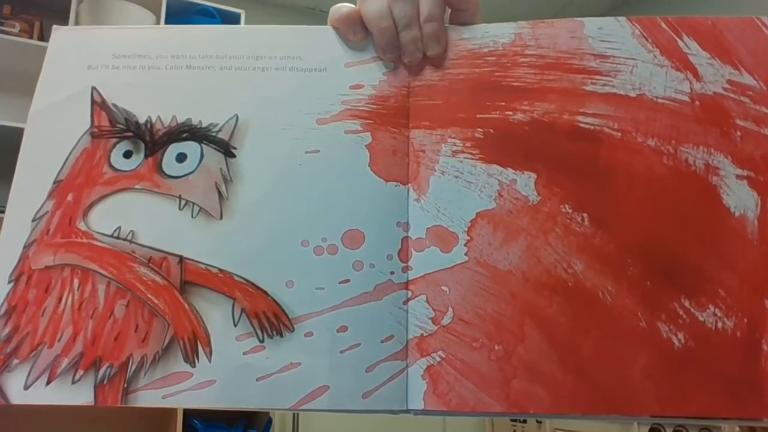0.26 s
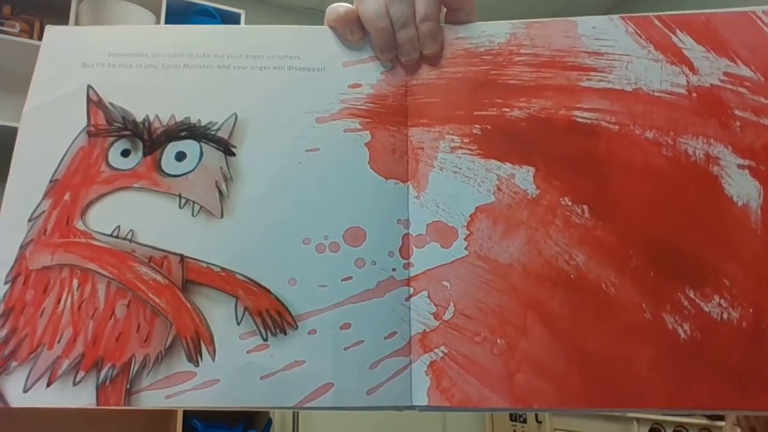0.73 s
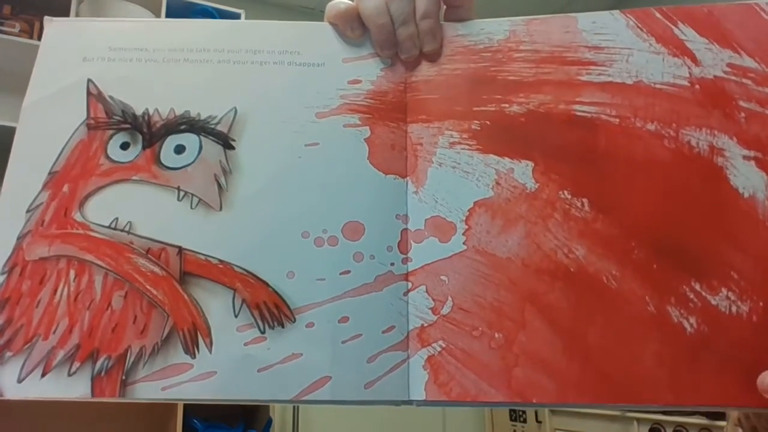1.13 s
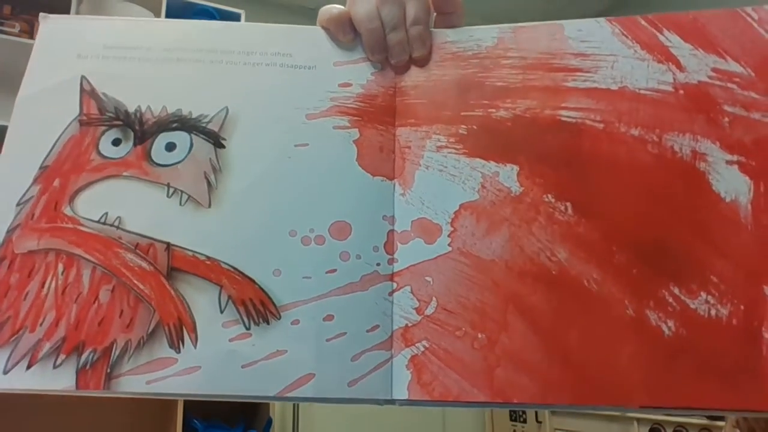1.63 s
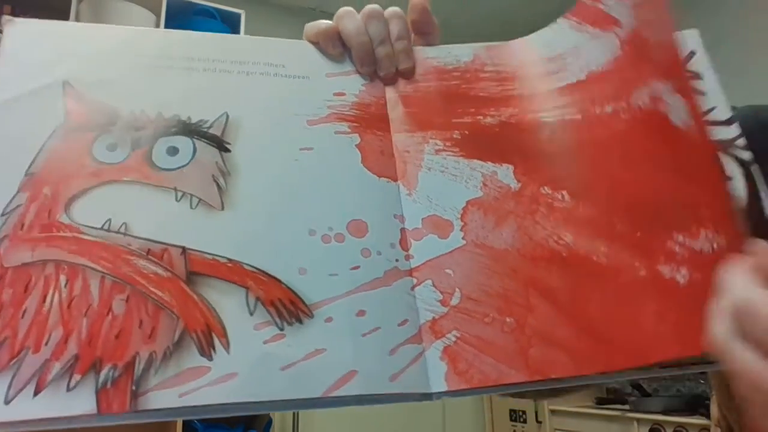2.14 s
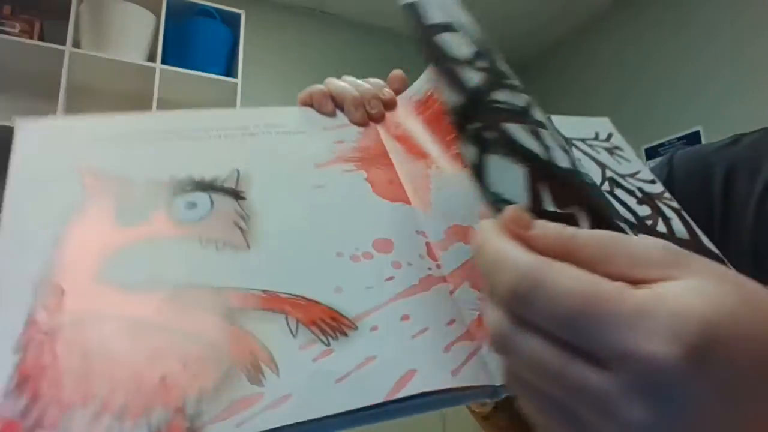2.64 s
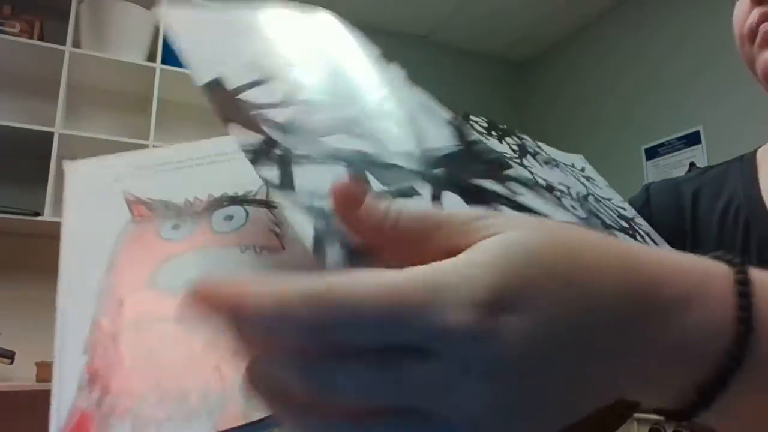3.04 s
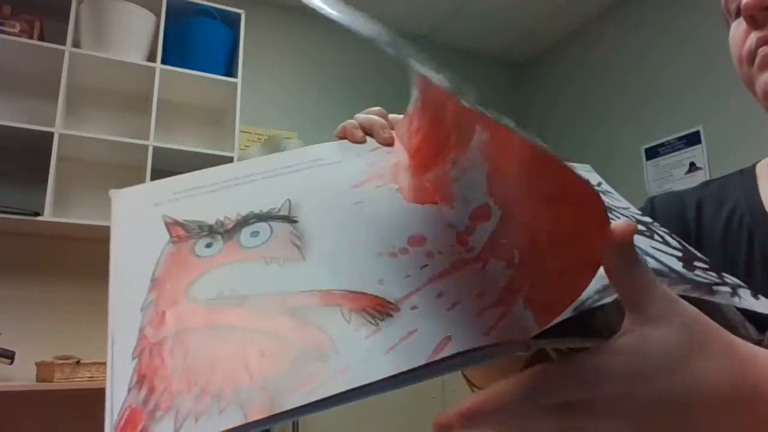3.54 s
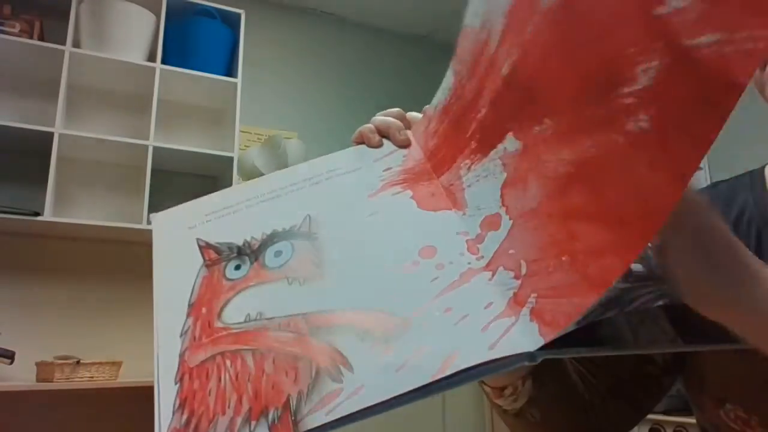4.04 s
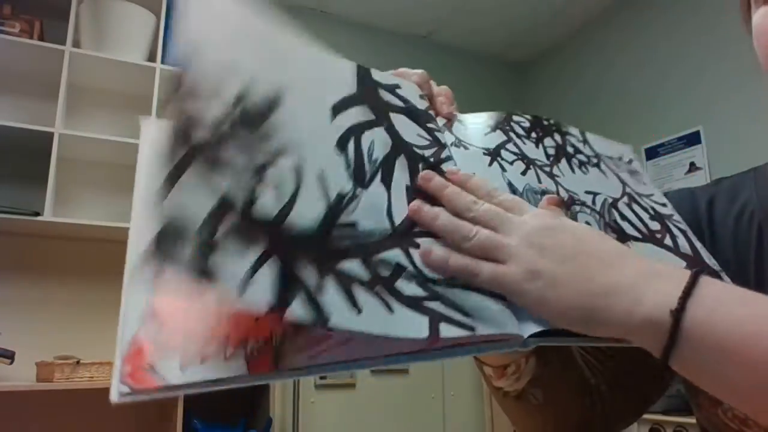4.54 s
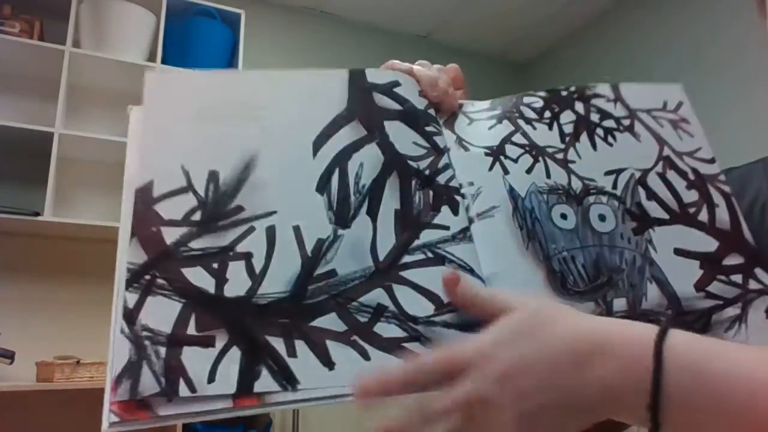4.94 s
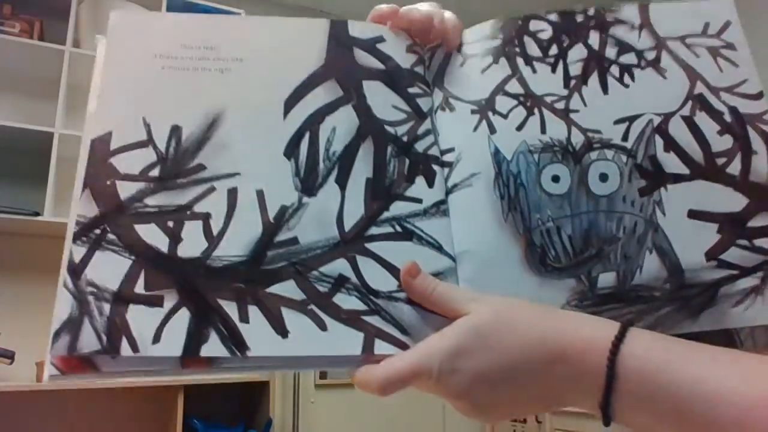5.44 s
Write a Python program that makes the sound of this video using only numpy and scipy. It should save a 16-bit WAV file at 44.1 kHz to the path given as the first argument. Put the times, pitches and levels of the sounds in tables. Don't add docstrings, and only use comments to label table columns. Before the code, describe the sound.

Close paper handling: near silence, then crisp snaps, fingertip rubs and a flexing page turned and smoothed flat over low room rumble.

```python
import sys
import numpy as np
from scipy import signal
from scipy.fft import rfft, irfft, dct, next_fast_len
from scipy.io import wavfile
from scipy.ndimage import uniform_filter1d, map_coordinates

SR = 44100
rng = np.random.default_rng(int(sys.argv[2]) if len(sys.argv) > 2 else 0)


def output_pcm(signal):
    pcm = np.clip(np.atleast_2d(signal).T, -1, 1) * 32767
    wavfile.write(sys.argv[1], SR, np.round(pcm).astype(np.int16))


def gain_from_decibels(decibels):
    exponent = np.asarray(decibels, float) / 20
    return 10 ** exponent


N = 251105
TOP_HZ = 15950

# f/Hz, density/dB per Hz
AIR_COLOUR = [(20, -77), (30, -47), (56, -18), (75, -9), (125, -1.5), (200, -10.5), (270, -23),
              (400, -29.5), (1000, -43.5), (2000, -51), (3500, -44.5), (8000, -39), (12000, -36),
              (16000, -41.5)]
# f/Hz, level/dB rms
WHINES = [(2907, -92), (8000, -80), (8683, -90), (10191, -94), (10907, -80), (11590, -85), (13098, -90)]
# f/Hz, t60/s
ROOM_DECAY = [(300, 0.18), (2000, 0.15), (6000, 0.17), (14000, 0.15)]
# f/Hz, width/Hz, level/dB
SHEET_MODES = [
    [(186, 66, 0.5), (370, 105, 1.5), (492, 110, 4.5), (701, 76, -0.5)],
    [(1006, 118, 1.5), (1177, 150, -1), (1540, 49, -0.5)],
]
# loudest t/s, low level/dB, upper re low level/dB, rise/ms, fall/ms
FLEXES = [(.75, -82.5, 10.5, 150, 59), (.96, -82.5, 6.5, 64, 110), (1.83, -72, 7, 80, 150),
          (2.11, -59.5, -6, 470, 62), (2.22, -70.5, -4.5, 250, 430), (2.843, -49, -7, 11, 63),
          (2.918, -49, 3, 12, 26), (3.05, -66.5, 4.5, 70, 98), (4.176, -41, -4.5, 36, 55),
          (4.4, -85, -4, 270, 220), (5.184, -67, 11, 8, 60), (5.34, -61, 2, 98, 43),
          (5.52, -58, -8.5, 280, 95), (5.672, -53.5, 2.5, 133, 37)]
# t/s, low level/dB, upper re low level/dB, fall/ms to 20 dB down
THUMPS = [(1.594, -55.5, 4, 16), (1.913, -56, 1.5, 25), (1.932, -62, 4, 60), (2.292, -69, -1, 74),
          (2.671, -54, -9, 65), (3.304, -62.5, -3.5, 149), (3.71, -48, -7.5, 60), (3.768, -52.5, -19, 109),
          (4.125, -50, -14, 300), (4.553, -56, 3, 23), (4.571, -56.5, 2.5, 32), (4.681, -55, 6.5, 38),
          (4.8, -59, -2.5, 48), (4.89, -70, -9, 450), (5.374, -37, 3.5, 16), (5.385, -54, -7, 66),
          (5.457, -56, 7, 37), (5.551, -47.5, -6, 29)]
# f/Hz, density/dB per Hz
POCKET_COLOUR = [(880, -59), (1500, -26), (3610, -6.5), (3890, -6), (4310, 3), (6570, -13), (7920, -10),
                 (11600, -22), (14000, -45)]
# f/Hz, density/dB per Hz
RASP_COLOUR = [(350, -29.5), (600, -20.5), (1740, -1), (2060, -11), (2770, 1), (3440, -3.5), (4130, 4),
               (4600, 2), (5070, 2.5), (6370, -3.5), (8000, -13.5), (10400, -48), (17600, -120)]
# f/Hz, density/dB per Hz
HISS_COLOUR = [(4000, -47), (7000, -13), (8500, -9.5), (12000, -6.5), (15800, -12.5), (17000, -6.5)]
# t/s, pressure level/dB
GLIDE_PRESSURE = [(1.55, -81.5), (1.75, -66.5), (1.85, -59.5), (1.94, -60.5), (2.13, -64.5), (2.45, -74),
                  (3.03, -67.5), (3.42, -70.5), (3.85, -82), (4.12, -80), (4.172, -54.5), (4.4, -61),
                  (4.5, -63.5), (4.64, -55), (4.7, -52), (5.09, -62.5), (5.52, -65), (5.694, -56)]
# start t/s, length/ms, level/dB, hiss re rasp level/dB, sag/dB over the length
DRAGS = [
    (.7, 60, -75, 10, 1),
    (1.786, 26, -61, 9, -2),
    (1.829, 58, -42.5, -0.5, 6.5),
    (2.672, 45, -71, -1, -2),
    (5.103, 11.7, -46, -3, 0.5),
    (5.456, 13, -52, -8, 1),
    (5.524, 23, -49, 2.2, 0),
]
# loudest t/s, level/dB, hiss re rasp level/dB, rise/ms, fall/ms to 20 dB down
SCRAPES = [(.956, -77, 12, 12, 12), (1.0, -78.5, 14, 68, 60), (1.822, -33, 1.5, 10, 6.5),
           (1.913, -46.5, -12, 5.1, 0), (1.935, -56, 0, 11, 40), (2.008, -40, 3, 11, 6),
           (2.015, -56, -6, 34, 33), (2.919, -33, -14, 11, 11.5), (3.688, -57, -1, 28, 38),
           (3.812, -64, 0, 46, 24), (4.268, -53.5, 5, 29, 62), (4.648, -43.5, -8, 22, 22),
           (4.685, -21.5, -6, 12.3, 3), (4.9, -48, 9, 250, 156)]
# t/s, middle peak level/dB, body peak level/dB, edge peak level/dB
LIFT_FLIPS = [(.6949, -47, -56.5, -42.5), (.7196, -56, -68, -51), (.7455, -55, -54, -52),
              (1.3104, -53, -69, -38), (1.5881, -31, -45, -29), (1.7374, -57, -55, -45),
              (1.79, -41.5, -61, -50), (1.82, -37, -42, -32), (1.9099, -29, -31.5, -36),
              (1.9299, -33, -42, -45), (1.9372, -41, -54, -49), (1.9473, -52, -51, -54),
              (2.1806, -53, -68, -57), (2.207, -54, -62, -50), (2.2395, -41.5, -57, -39),
              (2.2905, -35, -65, -26.5), (2.2934, -27.5, -50, -28), (2.4139, -51, -52.5, -57)]
# t/s, middle peak level/dB, body peak level/dB, edge peak level/dB
CURL_FLIPS = [(2.5108, -45, -64, -33), (2.5176, -47.5, -66, -35), (2.527, -55, -62, -35.5),
              (2.5932, -55, -62, -38.5), (2.6464, -61, -77, -52), (2.6666, -22.5, -39, -31.5),
              (2.7897, -59, -72, -40.5), (2.8005, -34, -46.5, -47), (2.841, -49, -42, -49),
              (2.974, -39.5, -51, -60), (2.9839, -43, -54, -56), (3.067, -48, -54, -61),
              (3.1064, -49, -67, -34.5), (3.16, -47.5, -63, -62), (3.1947, -42, -61, -38),
              (3.2104, -55, -73, -44), (3.2649, -35, -63, -30.5), (3.2924, -32, -50.5, -35),
              (3.3793, -55, -74, -52), (3.4305, -52, -65, -40.5), (3.518, -55, -66, -58),
              (3.664, -58, -53.5, -51)]
# t/s, middle peak level/dB, body peak level/dB, edge peak level/dB
LAY_FLIPS = [(4.1233, -33, -43, -36), (4.1663, -45, -35, -36), (4.255, -47, -48, -43),
             (4.28, -42, -59, -40), (4.3038, -39, -57, -43), (4.3803, -30.5, -51, -27.5),
             (4.3958, -42, -65, -25), (4.4031, -54, -72, -33), (4.4164, -28.5, -52, -22),
             (4.4278, -37, -53, -29), (4.4473, -42, -74, -43), (4.5532, -44, -53, -50),
             (4.6341, -36, -51, -45), (4.6453, -48, -43, -35), (4.6577, -33, -49, -37),
             (4.6708, -29, -37, -23), (4.8031, -22.5, -35.5, -13.5), (4.9879, -36, -63, -29.5),
             (4.996, -53, -68, -31), (5.0476, -46.5, -63, -36), (5.2135, -60, -71, -49),
             (5.2566, -36.5, -46, -55), (5.3046, -32.5, -57, -43), (5.3268, -39, -56, -53),
             (5.3503, -40, -56, -51), (5.3718, -23, -26, -23), (5.4012, -44, -46, -49),
             (5.5489, -37, -32, -45), (5.598, -46, -62, -58), (5.6885, -44, -59, -34)]
# rise/ms, fall/ms
FLIP_SHAPES = [
    (0.35, 1.8),
    (1.47, 0.79),
    (0.36, 1.46),
]
# t/s, length/ms, kept lines above local rms level/dB, share removed
THINNINGS = [(.308, 26, 8, .85), (.926, 26, 8, .85), (1.055, 24, 8, .85), (1.546, 26, 8, .85),
             (1.76, 50, 8, .75), (1.974, 44, 6, .75), (2.122, 36, 8, .85), (2.162, 40, 7, .75),
             (2.503, 30, 8, .85), (2.587, 30, 6, .8), (2.937, 48, 4, .85), (3.187, 30, 6, .85),
             (3.955, 36, 8, .85), (4.191, 46, 7, .8), (5.089, 36, 7.5, .97), (5.652, 66, 7.5, .99)]


def unit(x):
    return x / np.sqrt(np.mean(x ** 2) + 1e-20)


def along(points, hz):
    f, v = np.transpose(points)
    return np.interp(np.log(hz + 1), np.log(f + 1), v)


def curves(rows):
    s, *cols = np.transpose(rows)
    s = np.r_[s[0] - .008, s, s[-1] + .008]
    t = np.arange(N) / SR
    return np.array([np.interp(t, s, np.r_[-130, c, -130]) for c in cols], dtype=np.float32)


def swells(rows, power):
    out = np.zeros((2, N))
    for s, db, other_db, rise, fall in rows:
        first = max(round((s - rise / 300) * SR), 0)
        last = min(round((s + fall / 300) * SR), N)
        at = np.arange(first, last)
        ms = (at / SR - s) * 1000
        drop_db = 20 * np.abs(ms / np.where(ms < 0, rise, fall)) ** power
        out[:, at] += gain_from_decibels(np.c_[[db, db + other_db]] - drop_db)
    return out


def wobble(rate):
    coarse = np.arange(0, N + 8, 8)
    knots = rng.standard_normal(int(N * rate / SR) + 4)
    return np.interp(np.arange(N), coarse, map_coordinates(knots, [coarse * rate / SR]))


def filtered(x, response):
    m = next_fast_len(N + SR // 2)
    return irfft(rfft(x, m) * response(np.fft.rfftfreq(m, 1 / SR)), m)[..., :N]


def band(x, lo_hz, hi_hz):
    sos = signal.butter(2, [lo_hz, min(hi_hz, SR / 2.1)], "band", fs=SR, output="sos")
    return signal.sosfilt(sos, x)


def coloured(x, spectrum):
    return unit(filtered(x, lambda hz: gain_from_decibels(along(spectrum, hz))))


def patchy(x, depth_db):
    z = signal.stft(x, nperseg=256)[2]
    field = uniform_filter1d(rng.standard_normal(z.shape), size=9, axis=0)
    field = uniform_filter1d(field, size=9, axis=1)
    return signal.istft(z * gain_from_decibels(depth_db * unit(field)), nperseg=256)[1][:N]


def air():
    t, drift = np.arange(N) / SR, wobble(3.8)
    level = gain_from_decibels(-59 - 1.1 + .8 * wobble(3))
    noise = level * coloured(rng.standard_normal(N), AIR_COLOUR)
    whines = sum(gain_from_decibels(db + 3) * np.sin(2 * np.pi * hz * t + 0.27 * drift) for hz, db in WHINES)
    return noise + whines


def room(x):
    out, step = np.zeros(N + SR), SR // 3
    for i in range(0, N, step):
        hz, t, z = signal.stft(rng.standard_normal(step), SR, nperseg=128)
        decay = gain_from_decibels(-60 * t / along(ROOM_DECAY, hz)[:, None])
        tail = signal.istft(z * decay, SR, nperseg=128)[1]
        wet = signal.fftconvolve(x[i:i + step], tail / np.linalg.norm(tail))
        out[i + 60:][:len(wet)] += wet
    return out[:N]


def whisk():
    brush = swells([(3.4, -67.5, 0, 330, 300)], power=2.3)[0]
    return brush * unit(band(patchy(rng.standard_normal(N), depth_db=1.0), 12000, 14800))


def ring(modes):
    def response(f):
        total = 0
        for k, (centre, width, db) in enumerate(modes):
            damping = 1j * f * width
            total = total + (-1) ** k * gain_from_decibels(db) * damping / (centre * centre - f * f + damping)
        return total
    return response


def bend():
    push = rng.standard_normal(N) * gain_from_decibels(2.6 * wobble(150))
    buckles = [(s, db, upper_db, 3, fall) for s, db, upper_db, fall in THUMPS]
    moves = swells(FLEXES + buckles, power=0.85)
    out = np.zeros(N)
    for gain, modes in zip(moves, SHEET_MODES):
        out += gain * unit(band(filtered(push, ring(modes)), 110, 2700))
    return out


def pinch():
    grip = swells([(2.886, -38.5, 0, 44, 29)], power=0.94)[0]
    grains = rng.standard_normal(N) * gain_from_decibels(2.2 * wobble(610))
    return grip * coloured(grains, POCKET_COLOUR)


def friction(rasp, hiss, grit_db, slips):
    rub = rng.standard_normal(N) * gain_from_decibels(grit_db * wobble(slips) + 2.5 * wobble(slips / 10))
    ticks = 4 * rng.standard_normal(N) * (rng.random(N) < 80 / SR)
    rub = patchy(rub + ticks, depth_db=1.6)
    return rasp * coloured(rub, RASP_COLOUR) + hiss * coloured(rub, HISS_COLOUR)


def slide():
    pressure = gain_from_decibels(curves(GLIDE_PRESSURE)[0])
    gloss = gain_from_decibels(4.5)
    return friction(pressure, gloss * pressure, grit_db=2.5, slips=550)


def drags():
    catch_ms, release_ms = 4.3, 4.6
    out = np.zeros((2, N))
    for s, ms, db, edge_db, sag_db in DRAGS:
        end_db = db - sag_db
        steps = [(s - catch_ms / 1000, db - 20), (s, db),
                 (s + ms / 1000, end_db), (s + (ms + release_ms) / 1000, end_db - 20)]
        out += gain_from_decibels(curves([(at, level, level + edge_db) for at, level in steps]))
    return out


def scrapes():
    rasp, hiss = swells(SCRAPES, power=1.42) + drags()
    return friction(rasp, hiss, grit_db=1.0, slips=1000)


def peak_band(burst, lo_hz, hi_hz):
    v = band(band(burst, lo_hz / 1.96, hi_hz * 1.96), lo_hz, hi_hz)
    return v / np.abs(v).max(axis=1, keepdims=True)


def snaps():
    rows = []
    for table, shape in zip((LIFT_FLIPS, CURL_FLIPS, LAY_FLIPS), FLIP_SHAPES):
        rows += [(*row, *shape) for row in table]
    s, db, body_db, edge_db, rise, fall = np.transpose(rows)[..., None]
    z = rng.standard_normal((len(rows), 2, 1024))
    ms = np.arange(1024) / SR * 1000 - rise
    attack = np.exp(-1.2 * (ms / np.clip(rise, .45, 5)) ** 2)
    decay = np.exp(-.8 * (ms / np.clip(fall, .4, 5)) ** 2)
    rattle = 0.092 * np.exp(-np.abs(ms) / 4)
    crackle = z[:, 0] * gain_from_decibels(2.6 * z[:, 1]) * np.where(ms < 0, attack, decay + rattle)
    click = 2.25 * (np.abs(ms) < 600 / SR) * z[:, 1, :1]
    burst = crackle + click
    sound = gain_from_decibels(db) * peak_band(burst, 1800, 7500)
    sound -= gain_from_decibels(body_db) * peak_band(burst, 400, 1500)
    sound -= gain_from_decibels(edge_db) * peak_band(burst, 8000, 17500)
    at = np.round(s * SR).astype(int) + np.arange(1024)
    return np.bincount(at.ravel(), sound.ravel(), N + SR)[:N] * gain_from_decibels(-1.0)


def scene():
    cracks = snaps()
    rubs = scrapes() + pinch() + slide() + gain_from_decibels(-2.0) * bend() + whisk()
    bed = rubs + room(gain_from_decibels(-10.5) * cracks + gain_from_decibels(-19.5) * rubs) + air()
    mono = filtered(cracks, lambda hz: np.where(hz < TOP_HZ, 1, gain_from_decibels(-30)))
    mono = mono + filtered(bed, lambda hz: hz < TOP_HZ)
    return np.array([mono, mono])


def thinned(x):
    out = x.copy()
    for s, ms, keep_db, share in THINNINGS:
        n, start = round(ms * SR / 1000), round((s - ms / 2000) * SR)
        fade = np.sin(np.pi * np.arange(n) / n) ** .7
        lines = dct(x[:, start:start + n] * fade, norm="ortho")
        local = np.sqrt(np.abs(uniform_filter1d(lines ** 2, size=401)))
        high = np.arange(n) * SR / 2 / n > 600
        weak = (np.abs(lines) < gain_from_decibels(keep_db) * local) & high
        removed = lines * np.where(weak, share, -.4 * high)
        out[:, start:start + n] -= fade * dct(removed, 3, norm="ortho")
    return out


def band_limit(x):
    return signal.sosfilt(signal.butter(12, 16950, fs=SR, output="sos"), x)


def record(dry):
    mix = thinned(dry)
    return band_limit(mix)


dry = scene()
out = record(dry)
output_pcm(out)
```